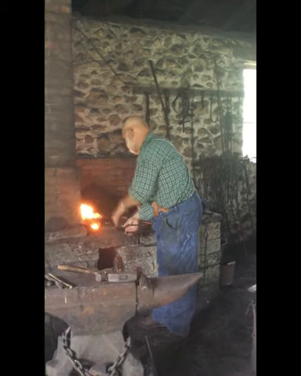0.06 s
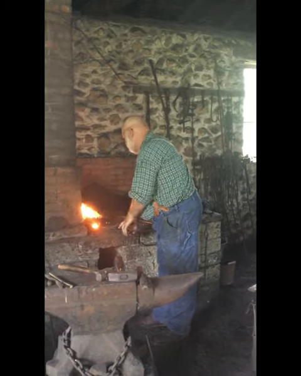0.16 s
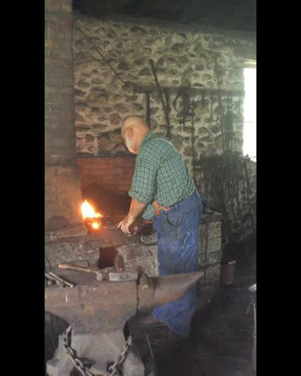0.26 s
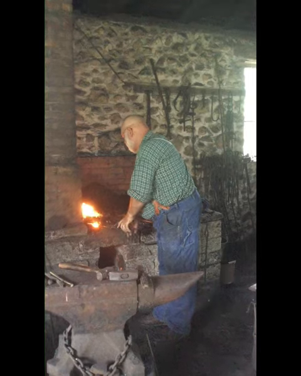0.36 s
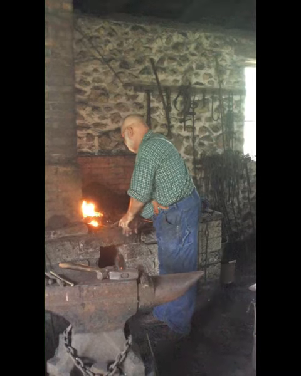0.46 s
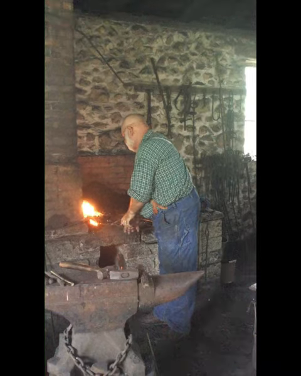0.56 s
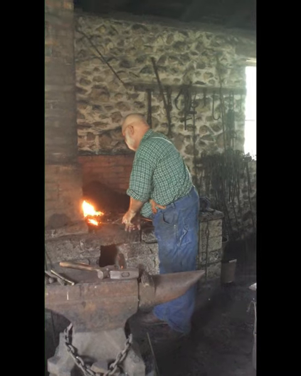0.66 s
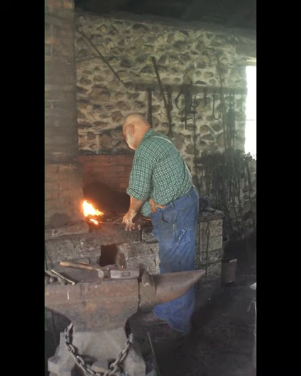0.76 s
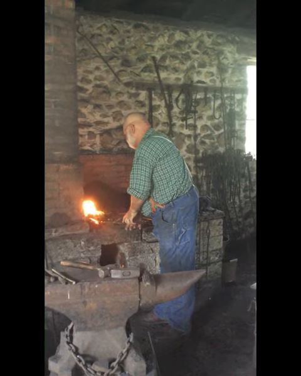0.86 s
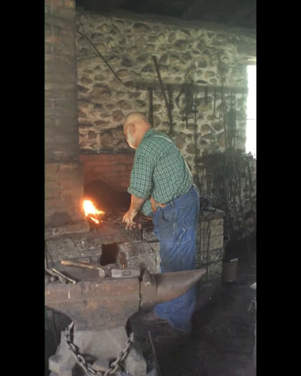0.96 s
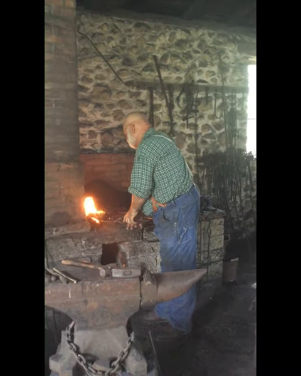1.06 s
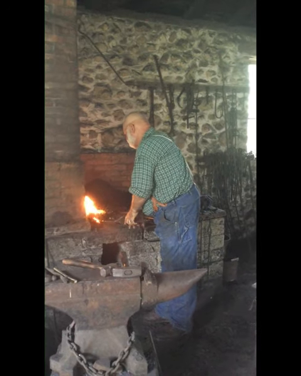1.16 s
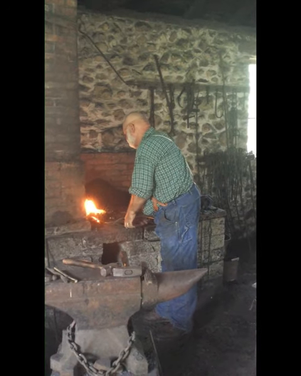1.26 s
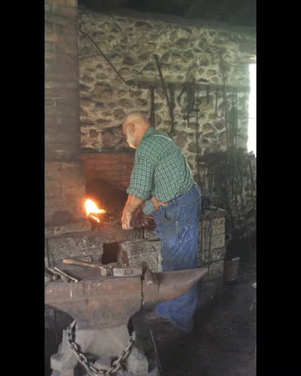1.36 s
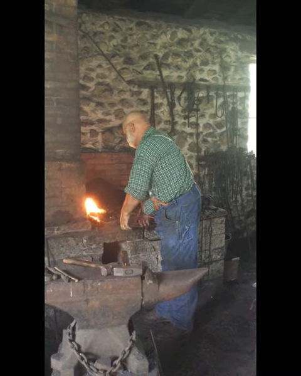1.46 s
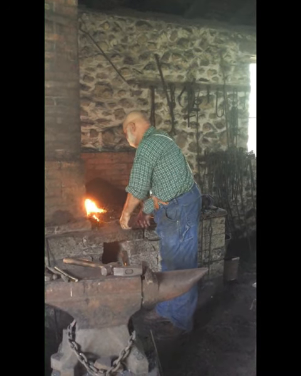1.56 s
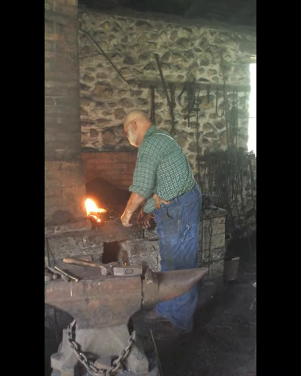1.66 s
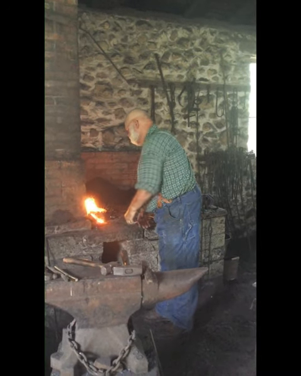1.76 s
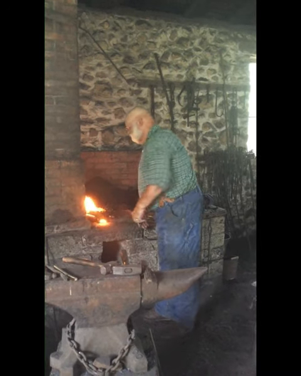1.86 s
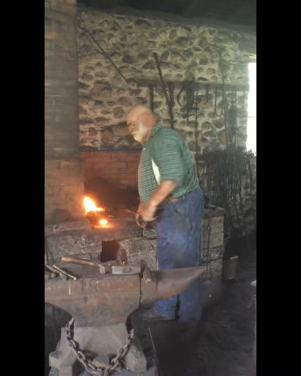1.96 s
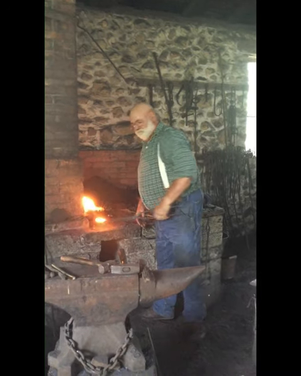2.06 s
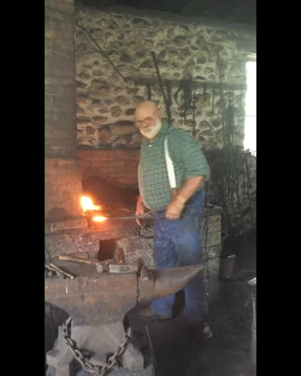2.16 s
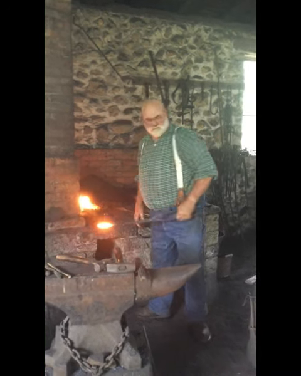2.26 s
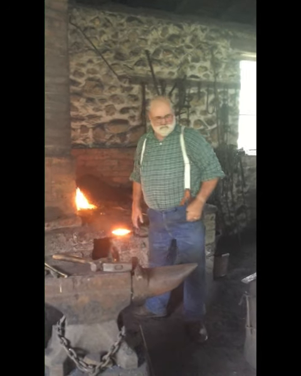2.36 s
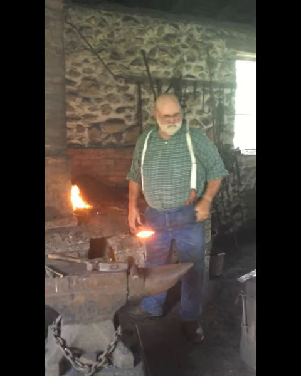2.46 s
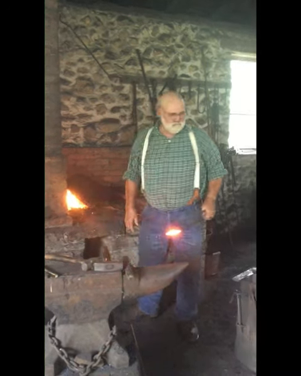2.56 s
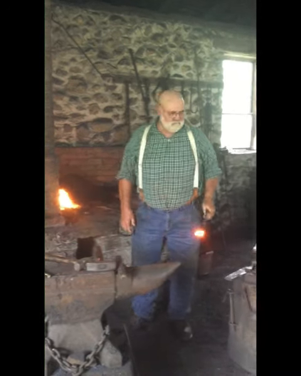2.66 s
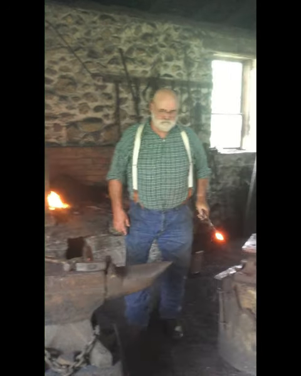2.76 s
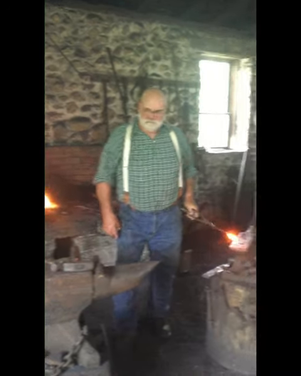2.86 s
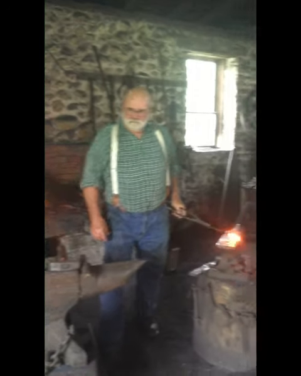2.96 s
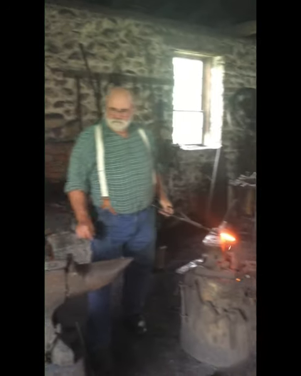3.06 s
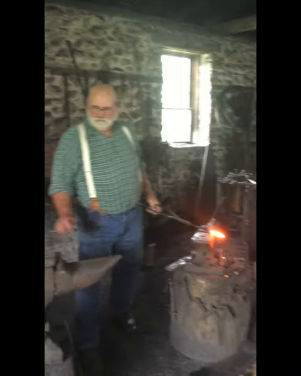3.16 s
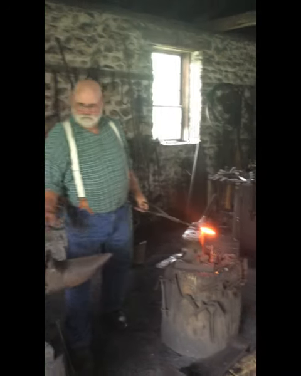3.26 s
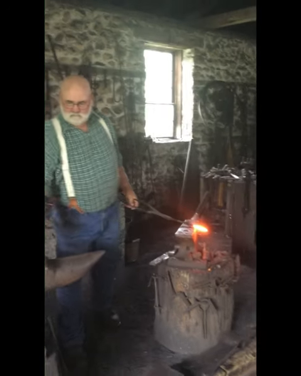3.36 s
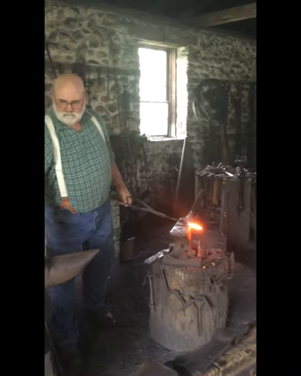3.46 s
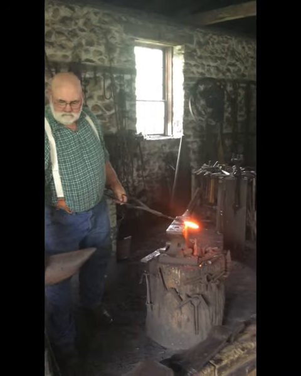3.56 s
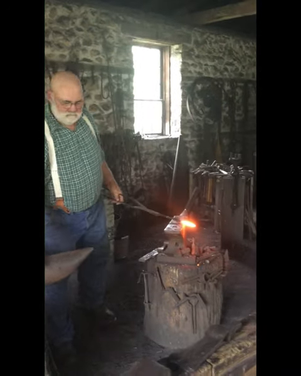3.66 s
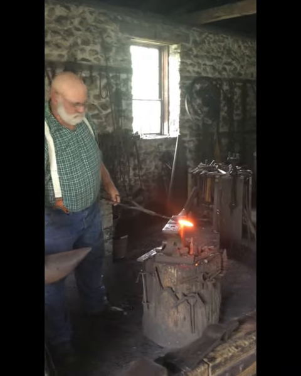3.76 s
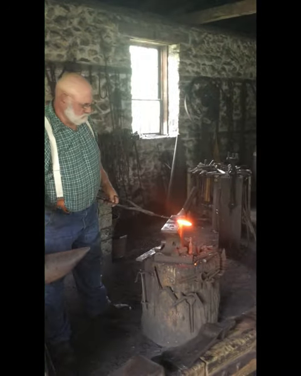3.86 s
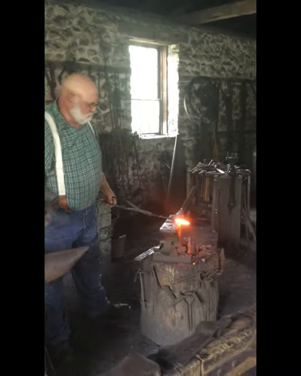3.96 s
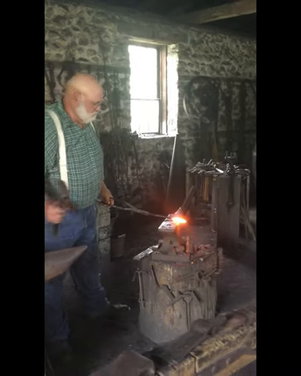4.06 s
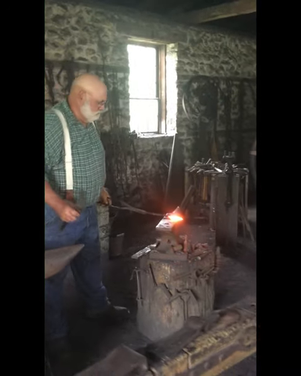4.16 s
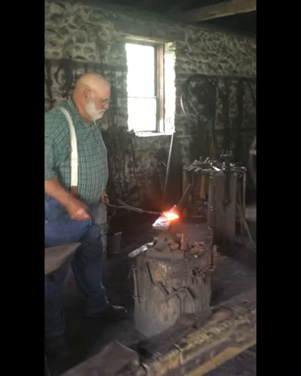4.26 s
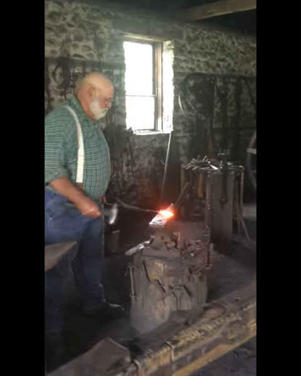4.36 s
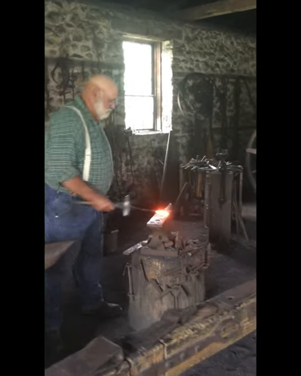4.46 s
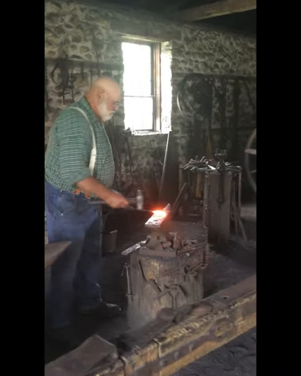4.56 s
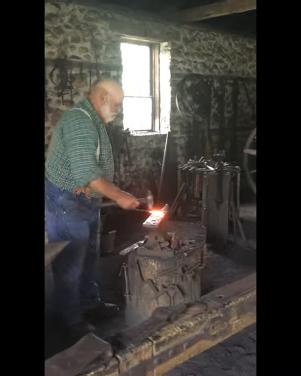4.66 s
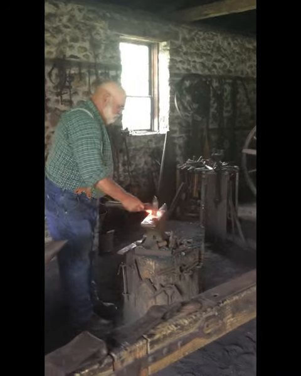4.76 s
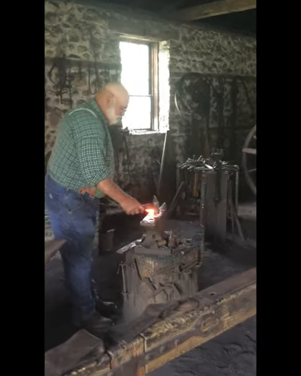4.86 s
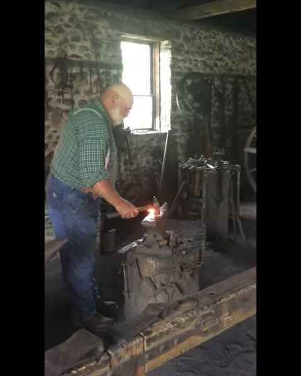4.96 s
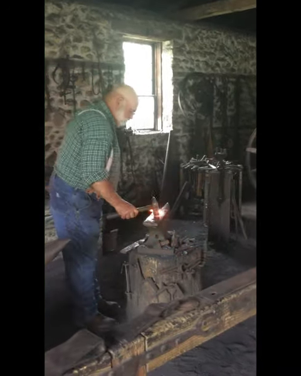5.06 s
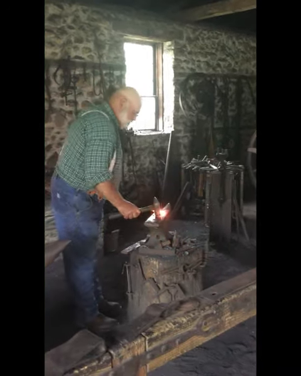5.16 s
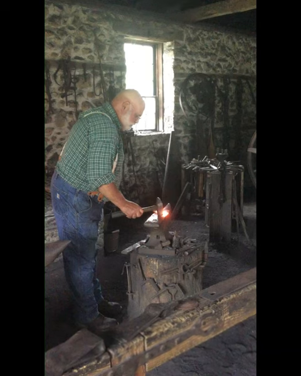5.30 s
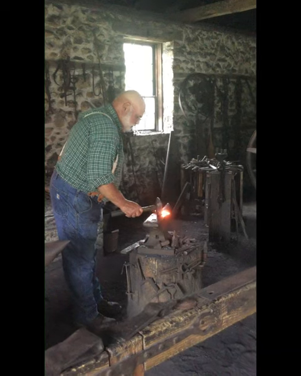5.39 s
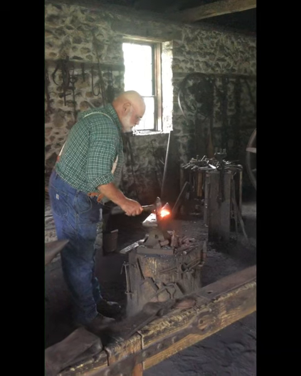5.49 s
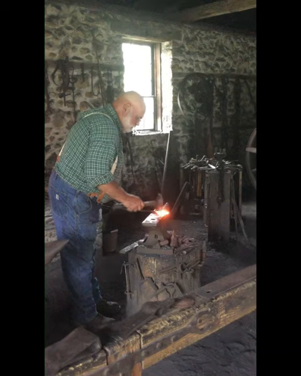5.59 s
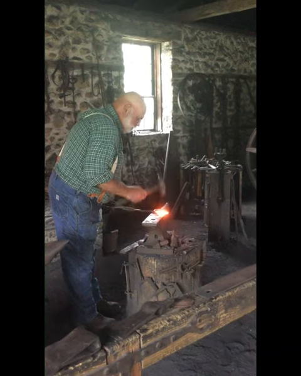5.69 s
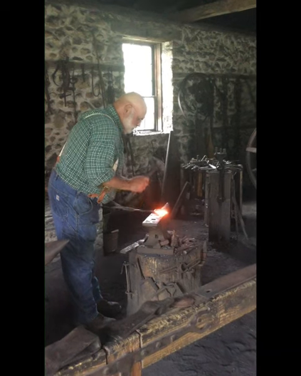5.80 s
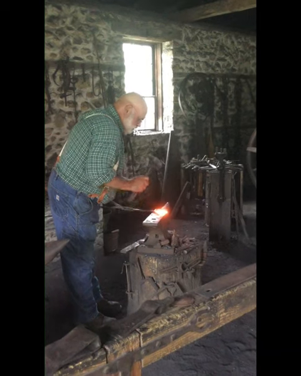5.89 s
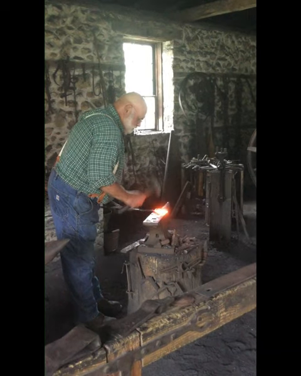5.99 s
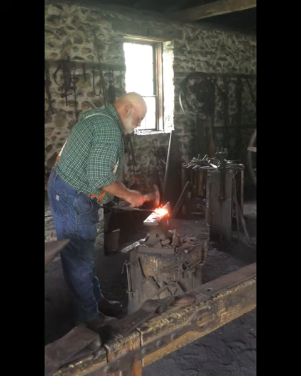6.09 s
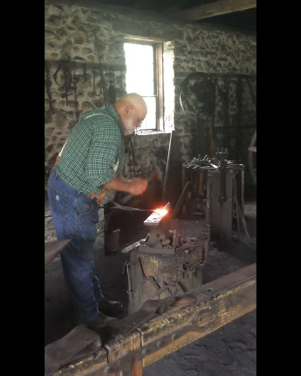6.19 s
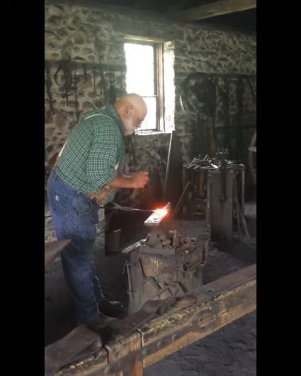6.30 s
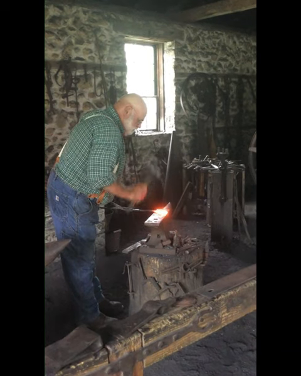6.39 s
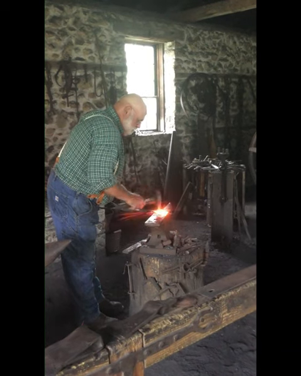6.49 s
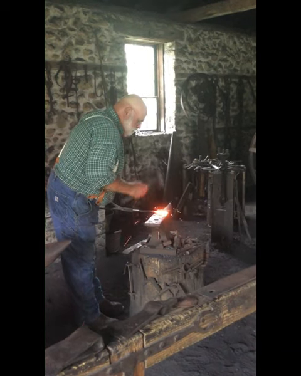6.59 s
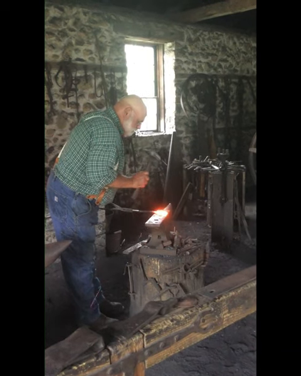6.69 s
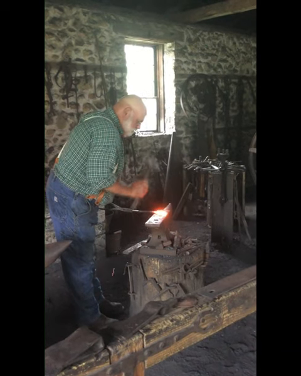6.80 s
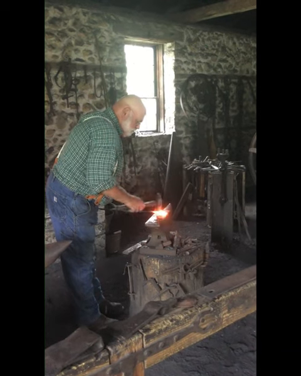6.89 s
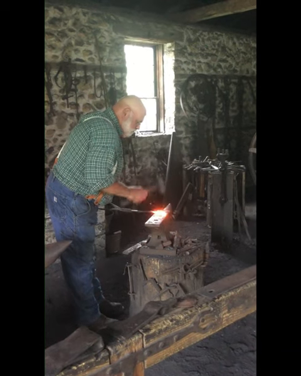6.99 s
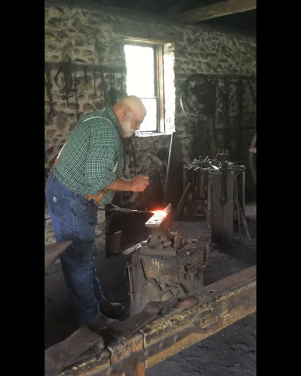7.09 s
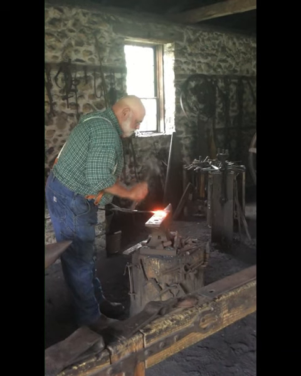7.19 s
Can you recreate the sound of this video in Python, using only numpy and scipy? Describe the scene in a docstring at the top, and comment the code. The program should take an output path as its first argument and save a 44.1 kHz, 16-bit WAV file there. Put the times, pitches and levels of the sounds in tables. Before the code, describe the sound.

A small handheld microphone hears a blacksmith's stone-walled shop: soft roaring fire and gritty hiss, one deep drum-like boom, then shuffling steps and small knocks. Hot metal touches the anvil with a bright double click. The hammer hits the bare face, bounces in quickening clacks and leaves a high ring. Three evenly spaced, heavy metallic strikes follow as the forge roar returns, the room answering densely.

```python
"""A stone-walled smithy. The forge blast roars as filtered, fluttering noise, and a heavy thump booms in
detuned low modes. The blast dies away and the glowing bar is laid on the anvil: short cracks that set modes
ringing. A low rumble of the shop swells briefly just before the hammer drops on the bare face, bounces, rattles
and settles. Three blows fall on hot iron while the blast returns. Throughout, boots, cloth and tools scuff
(grainy noise) and knock (damped notes) over the fire's grit and hiss, and the hall answers with dense echoes."""
import sys
import numpy as np
from scipy import signal
from scipy.fft import rfft, irfft, next_fast_len
from scipy.io import wavfile

SR = 44100
rng = np.random.default_rng(int(sys.argv[2]) if len(sys.argv) > 2 else 0)


def int16_out(signal):
    """Quantize to a 16-bit WAV file."""
    q = np.round(np.clip(np.atleast_2d(signal).T, -1, 1) * 32767)
    wavfile.write(sys.argv[1], SR, q.astype(np.int16))


N = 319284

# hammer blows on hot iron: (time [s], level [dB])
BLOWS = [(6.1185, -3), (6.5515, -1.5), (6.9705, -0.5)]
# the dropped hammer bouncing on the bare face: (time [s], level [dB])
BOUNCES = [(4.86, -3.5), (4.976, -6), (5.054, -16), (5.113, -14), (5.158, -16)]
# the hammer coming to rest: (time [s], level [dB])
SETTLING = [(5.203, -25)]
# the bar touching down on the anvil: (time [s], level [dB])
LAYING = [(3.0721, -11.5), (3.0815, -17)]


def amp(db):
    """dB to gain."""
    return 10 ** (np.asarray(db) / 20)


def rms_one(x):
    """Scale to rms 1."""
    return x / np.sqrt(np.mean(x ** 2) + 1e-20)


def at_hz(points, hz):
    """Read a table of values by frequency on a log-frequency axis."""
    table_hz, values = np.transpose(points)
    return np.interp(np.log(np.maximum(hz, 1)), np.log(table_hz), values)


def coloured(x, spectrum):
    """Give noise the spectrum, at rms 1."""
    size = next_fast_len(N)
    gain = amp(at_hz(spectrum, np.fft.rfftfreq(size, 1 / SR)))
    return rms_one(irfft(rfft(x, size) * gain, size)[:N])


def drift(rate):
    """Random wander: straight lines between values of spread 1, at this many values per second."""
    steps = rng.standard_normal(600)
    return np.interp(np.arange(N) / SR * rate, np.arange(len(steps)), steps)


def clicks_of(events):
    """One single-sample click for each row (time [s], level [dB])."""
    clicks = np.zeros(N)
    for s, db in events:
        clicks[round(s * SR)] = amp(db)
    return clicks


def ring(clicks, hz, t60):
    """A two-pole resonator: a unit click sets a decaying sine of height 1 ringing."""
    radius, angle = amp(-60 / (t60 * SR)), 2 * np.pi * hz / SR
    poles = [1, -2 * radius * np.cos(angle), radius * radius]
    return signal.lfilter([0, np.sin(angle)], poles, clicks + 1e-18)


def swelling_ring(clicks, hz, t60, swell_s):
    """A mode fed through the body: taking away a faster-dying ring makes it grow before it dies."""
    faster_t60 = 1 / (1 / t60 + 1 / (np.log(1000) * swell_s))
    return ring(clicks, hz, t60) - ring(clicks, hz, faster_t60)


def crack(events, spectrum, length_s, db, rise_s=0.00046):
    """Contacts through a causal minimum-phase filter: as noisy chatter, and as plain pulses of that energy."""
    size = 8192
    # folding the cepstrum puts the energy of the spectrum as early as possible
    cepstrum = irfft(np.log(amp(at_hz(spectrum, np.fft.rfftfreq(size, 1 / SR)))), size)
    cepstrum[1:size // 2] *= 2
    pulse = irfft(np.exp(rfft(cepstrum[:size // 2 + 1], size)), size)
    pulse = pulse / np.linalg.norm(pulse)
    age = np.arange(size // 4) / SR
    shape = (1 - np.exp(-age / rise_s)) * np.exp(-age / length_s)
    clicks = clicks_of(events)
    chatter = signal.fftconvolve(clicks, shape)[:N] * rng.standard_normal(N)
    both = np.array([chatter, np.linalg.norm(shape) * clicks])
    return amp(db) * signal.fftconvolve(both, pulse[None])[:, :N]


def rattle(count):
    """The loose hammer chatters: touches of uneven level at random moments between its last bounces."""
    from_s, to_s = 4.99, 5.22
    softest_db, range_db = -33, 16.2
    draws = rng.random((count, 2))
    return [(from_s + a * (to_s - from_s), softest_db + range_db * b) for a, b in draws]


def anvil_cracks():
    """The crack of each contact on the anvil, as a (chatter, plain pulse) pair of signals."""
    # colour of hot iron, bare face and bar: (frequency [Hz], relative level [dB])
    blow_colour = [(29, -40.5), (80, -18), (234, -2), (329, -16.5), (740, -10.5), (1020, -18), (1540, -12),
                   (1660, -4), (1820, -13), (2320, -6), (2620, -18), (3410, -12), (4350, -18), (11700, -18),
                   (16000, -19.5)]
    bounce_colour = [(29, -55), (50, -11), (75, 1), (114, -12.5), (234, -4.5), (495, -19), (1910, -8),
                     (2320, -4), (3180, -9), (3850, -6.5), (6550, -25.5), (13500, -34.5), (16000, -49)]
    laying_colour = [(240, -14), (400, -20), (1310, -22), (1460, -16.5), (3690, -4.5), (4180, -3.5),
                     (6640, -4), (9760, -9), (12500, -3.5), (16000, -25.5)]
    blows = crack(BLOWS, blow_colour, 0.002, db=0)
    laying = crack(LAYING, laying_colour, 0.0035, db=-6.5)
    bounces = crack(BOUNCES + SETTLING + rattle(count=8), bounce_colour, 0.0028, db=-4.5)
    return blows + laying + bounces


def anvil_rings():
    """Contacts drive shared modes at their own strengths; neighbours start opposed and each ring wavers."""
    # modes of the room (the lowest pair), stump, hammer and anvil: (frequency [Hz])
    modes_hz = [63, 72, 200, 232, 265, 888, 1634, 1646, 2252, 2345, 3505, 3783, 4839, 5280, 5670, 7757,
                9860, 10520, 11436, 13470, 14850]
    # response of each mode: (t60 [s], swell [s], hot-iron blow [dB], bare-face bounce [dB],
    # hammer settling [dB], bar laid down [dB])
    modes = [(0.6, 0.011, -27, -39, -25, -60), (0.64, 0.0067, -28.5, -39.5, -34, -58),
             (0.48, 0.0035, -30, -34, -44, -50), (0.12, 0.0059, -33.5, -14.5, -17.5, -39),
             (0.24, 0.031, -42.5, -22, -3, -51), (0.093, .005, -50, -27.5, -10.5, -59),
             (0.58, .003, -28.5, -47, -36, -62), (0.55, 0.0033, -25, -50, -39, -63),
             (0.25, 0.0056, -22.5, -53, -14, -53), (0.083, .002, -49, -16.5, -31, -35),
             (0.52, .015, -20.5, -32.5, 0.5, -27.5), (0.28, 0.016, -24.5, -16.5, -36, -20.5),
             (0.21, 0.0062, -30, -25, -37, -40), (0.11, .005, -40, -31.5, -44, -34),
             (0.15, 0.0023, -25, -34, -48, -31), (.12, .005, -45, -43.5, -48, -24),
             (0.43, .02, -47, -62, -40, -58), (0.18, 0.011, -53.5, -40, -49, -34),
             (0.12, .005, -31, -38, -41, -40), (.1, .005, -33.5, -40.5, -43, -48),
             (.75, .03, -55.5, -65.5, -57, -54.5)]
    waver_db, waver_rate = 2.65, 13
    blows, settling, laying = clicks_of(BLOWS), clicks_of(SETTLING), clicks_of(LAYING[:1])
    rings = 0
    for k, (hz, (t60, swell_s, *levels_db)) in enumerate(zip(modes_hz, modes)):
        # each bounce lands on a whole cycle, so it feeds the ring in step
        bounces = clicks_of([(round(s * hz) / hz, db) for s, db in BOUNCES])
        pushes = amp(levels_db) @ np.array([blows, bounces, settling, laying])
        waver = amp(waver_db * drift(waver_rate))
        rings = rings + (-1) ** k * waver * swelling_ring(pushes, hz, t60, swell_s)
    return rings


def long_ring():
    """A near-pure tone, probably the hammer head turning in the hand: half-sine lobes on a dying ring."""
    # lobes: (start [s], length [s], level before shaping [dB], flutter depth at the lobe's end [0-1])
    lobes = [(3.084, .13, -42.5, .05), (3.187, .15, -45, 0.1), (3.268, 0.68, -44.5, 0.83),
             (4.89, .16, -35.5, 0.2), (5.033, 0.11, -41, .1), (5.216, 0.41, -41.5, 0.14),
             (5.7, 0.097, -60, .05), (5.803, 0.27, -53.5, 0.1), (6.23, 0.48, -60.5, .05),
             (6.63, 0.17, -54, .05), (6.767, 0.42, -48, 0.1), (7, 0.31, -39, 0.2)]
    tone_hz, t60_s, flutter_hz = 4427, 1.83, 35.4
    t, level = np.arange(N) / SR, np.zeros(N)
    for s, length_s, db, depth in lobes:
        age = np.clip(t - s, 0, length_s)
        lobe = np.sin(np.pi * age / length_s) * amp(db - 60 * age / t60_s)
        growing_depth = np.clip(depth * age / length_s, 0, 1)
        level += lobe * (1 + growing_depth * np.sin(2 * np.pi * flutter_hz * t))
    return np.sqrt(2) * level * np.sin(2 * np.pi * tone_hz * t)


def thump():
    """A dull blow on a hollow body; neighbouring modes start opposed, so the boom swells and throbs."""
    # the blow: (time [s], level [dB])
    blow = [(1.094, -18.5)]
    # modes of the hollow body: (frequency [Hz])
    modes_hz = [58, 95, 106, 121, 230, 275, 700]
    # response of each mode: (t60 [s], swell [s], level [dB])
    modes = [(0.99, 0.024, -12), (1, 0.086, 1.5), (0.59, 0.0057, -5), (0.92, 0.019, 3.5),
             (0.25, 0.0066, -27), (.25, 0.0046, -28), (0.09, 0.0038, -31)]
    muffled_at_s, muffled_db = 1.235, -28  # the body is damped soon after the blow
    clicks, boom = clicks_of(blow), 0
    for k, (hz, (t60, swell_s, db)) in enumerate(zip(modes_hz, modes)):
        boom = boom + (-1) ** k * amp(db) * swelling_ring(clicks, hz, t60, swell_s)
    damping_s = [muffled_at_s - 0.01, muffled_at_s + 0.008]
    return boom * amp(np.interp(np.arange(N) / SR, damping_s, [0, muffled_db]))


def slap():
    """The skin of the hollow body is met just before it booms: a soft-edged burst of chatter."""
    # the contact: (time [s], level [dB])
    contact = [(1.089, -13)]
    # colour of the skin: (frequency [Hz], relative level [dB])
    skin_colour = [(88, -11), (150, -4), (275, -3), (341, -7.5), (376, -5.5), (534, -17), (662, -11.5),
                   (1120, -23.5), (1630, -29), (16000, -54.5)]
    chatter, _ = crack(contact, skin_colour, 0.028, db=-6.5, rise_s=0.0071)
    return chatter


def knocks():
    """Tools and boots: each knock is one short damped note with a soft contact."""
    # knocks: (time [s], level [dB], pitch [Hz], t60 [s], held to 2 ms or more)
    notes = [(1.195, -34, 4000, 0.0023), (2.659, -44, 125, 0.068), (3.268, -49, 74, 0.14),
             (3.811, -48.5, 102, 0.043), (2.666, -51, 3520, 0.018), (2.871, -49, 1080, 0.023),
             (2.885, -35, 85.6, 0.09), (3.192, -37, 139, 0.048), (2.92, -33, 1590, 0.0083),
             (3.049, -45, 2000, .01), (3.192, -39, 1120, 0.014), (3.216, -35, 126, 0.038),
             (3.739, -53.5, 2080, 0.044), (3.739, -55, 1086, 0.05), (4.245, -43.5, 1220, 0.012),
             (4.323, -49, 1306, 0.034), (4.514, -50, 820, 0.024), (4.552, -21, 1302, 0.0066),
             (4.552, -25, 860, 0.0064), (4.551, -53, 1750, 0.0034), (4.77, -45.5, 850, 0.012),
             (5.839, -39, 1100, 0.0038)]
    soft_s = 0.00039
    return sum(swelling_ring(clicks_of([(s, db)]), hz, max(t60, 0.002), soft_s)
               for s, db, hz, t60 in notes)


def early_echoes(x):
    """Single delayed copies from floor and wall."""
    # nearest surfaces: (delay [s], level [dB])
    surfaces = [(.0035, -21.5), (0.0123, -9)]
    return sum(amp(db) * np.roll(x, round(s * SR)) for s, db in surfaces)


def hall(x):
    """Dense reflections: half-octave noise bands that build up quickly and die at their own rates."""
    # decay time of the hall: (frequency [Hz], t60 [s])
    hall_t60 = [(60, 1), (160, 0.81), (420, 0.62), (1100, 0.5), (2900, 0.42), (7700, 0.29), (15000, 0.24)]
    hall_db, build_up_s = -28.5, 0.00067
    age = np.arange(SR) / SR
    edges = 40 * 2 ** np.arange(0, 9.1, 0.5)
    white, echo = rng.standard_normal((2, SR)), 0
    for k, (low, high) in enumerate(zip(edges, edges[1:])):
        band_filter = signal.butter(2, [low, high], "band", fs=SR, output="sos")
        band = signal.sosfilt(band_filter, white[k % 2])  # neighbouring bands use separate noises
        echo = echo + band * amp(-60 * age / at_hz(hall_t60, np.sqrt(low * high)))
    echo = echo * (1 - np.exp(-age / build_up_s))
    return amp(hall_db) * signal.fftconvolve(x, echo)[:N]


def forge_blast(blast_db):
    """Air blast of the forge and low rumble of the shop: coloured noise with a random flutter."""
    # colour: (frequency [Hz], relative level [dB])
    blast_colour = [(15, -53.5), (25, -19), (79, -4), (130, 1), (231, -9.5), (366, -8), (460, -21),
                    (540, -23), (634, -14.5), (798, -20), (936, -32), (1150, -23.5), (1350, -37.5),
                    (2690, -46.5), (6000, -43.5), (7800, -74), (13200, -120)]
    flutter_db, flutter_rate = 2.5, 18
    level = amp(blast_db + flutter_db * drift(flutter_rate))
    return level * coloured(rng.standard_normal(N), blast_colour)


def gritty_noise():
    """Noise grains of uneven size, with sparse single grains that crack on top."""
    grains_per_s, grain_share = 150, 0.61
    grit = rng.standard_normal(N) * amp(3.2 * np.minimum(rng.exponential(1, N), 5))
    single = grit * (rng.random(N) < grains_per_s / SR)
    return rms_one(grit) + grain_share * rms_one(single)


def fire_and_scuffs(blast_db):
    """Grit and hiss: the fire follows the blast, and boots, cloth and tools add swells by power."""
    # scuffs: (peak time [s], rise [s], fall [s], grit level [dB], hiss level [dB])
    scuffs = [(0.27, .03, .1, -91, -77), (0.64, 0.11, .2, -66, -66), (0.78, 0.084, .07, -65, -66),
              (1.604, .06, .08, -67, -70), (1.92, 0.23, .08, -60.5, -74), (2.19, 0.062, 0.55, -65, -78),
              (2.8, 0.75, .15, -63.5, -72), (2.925, 0.11, 0.28, -50.5, -75),
              (3.328, 0.094, 0.034, -63, -64), (3.466, 0.12, 0.15, -49.5, -66),
              (3.696, 0.036, 0.068, -62, -56.5), (4.09, 0.16, 0.55, -62.5, -64),
              (4.252, 0.047, 0.061, -55.5, -62.5), (4.42, .3, 0.54, -64, -70.5),
              (4.656, .1, 0.086, -47, -67.5), (4.773, 0.03, 0.028, -38, -60), (4.83, 0.11, 0.15, -45, -76),
              (5.42, 0.064, .06, -66, -65), (5.838, 0.0084, .035, -61.5, -78),
              (5.939, .04, 0.12, -68.5, -83), (6.81, 0.011, 0.024, -70, -57)]
    # colours of the grit and of the hiss: (frequency [Hz], relative level [dB])
    scuff_colour = [(120, -9.5), (250, -5), (440, -18), (1600, -15.5), (4200, -27.5), (9000, -41),
                    (16000, -63.5)]
    hiss_colour = [(3000, -20), (6000, -4), (12000, -2.5), (16000, 1)]
    fire_grit_db, fire_hiss_db = -19, -35  # relative to the blast
    slope_db = 15  # drop from the peak at one rise before it or one fall after it
    t = np.arange(N) / SR
    grit_level = amp(blast_db + fire_grit_db + 2.0 * drift(9))
    hiss_level = amp(blast_db + fire_hiss_db + 4.0 * drift(9))
    for s, rise_s, fall_s, grit_db, hiss_db in scuffs:
        shape = amp(-slope_db * np.maximum((s - t) / rise_s, (t - s) / fall_s))
        grit_level = np.hypot(grit_level, amp(grit_db) * shape)
        hiss_level = np.hypot(hiss_level, amp(hiss_db) * shape)
    grit = grit_level * coloured(gritty_noise(), scuff_colour)
    hiss = hiss_level * coloured(rng.standard_normal(N), hiss_colour)
    return grit + hiss


def still_air():
    """The still shop: steady, quiet coloured noise."""
    # colour: (frequency [Hz], relative level [dB])
    air_colour = [(40, -0.5), (120, -2), (300, -7.5), (870, -20.5), (3200, -17.5), (6000, -24),
                  (16000, -29.5)]
    return amp(-66) * coloured(rng.standard_normal(N), air_colour)


def background():
    """The forge blast, its fire with the scuffs, and the still air."""
    # level of the blast and low rumble: (time [s], level [dB])
    blast_levels = [(0, -49.5), (1.0, -49.5), (2.6, -50), (3.0, -55), (3.45, -67), (4.55, -72), (4.68, -51),
                    (4.8, -40), (4.9, -52), (5.4, -68), (5.75, -68.5), (7.24, -49.5)]
    blast_db = np.interp(np.arange(N) / SR, *np.transpose(blast_levels))
    return forge_blast(blast_db) + fire_and_scuffs(blast_db) + still_air()


def scene():
    """Contacts, rings and boom, their hall echo and the background."""
    ring_send_db, boom_send_db = -4, -12.5
    near, spread = anvil_cracks()  # the walls hear the average of the chatter over all directions
    rings, boom = anvil_rings(), thump()
    other = knocks() + slap()
    echo = hall(spread + other + amp(ring_send_db) * rings + amp(boom_send_db) * boom)
    direct = near + early_echoes(near) + other + rings + long_ring() + boom
    return (direct + echo + background())[None]


def record(dry):
    """The small microphone loses the deep bass, peaks are rounded, the top is cut."""
    cutoff_hz = 16500
    thin = signal.sosfilt(signal.butter(2, 40, "high", fs=SR, output="sos"), dry)
    rounded = 1.2 * np.tanh(thin / 1.2)
    return signal.sosfilt(signal.cheby2(16, 80, cutoff_hz, fs=SR, output="sos"), rounded)


dry = scene()
out = record(dry)
int16_out(out)
```